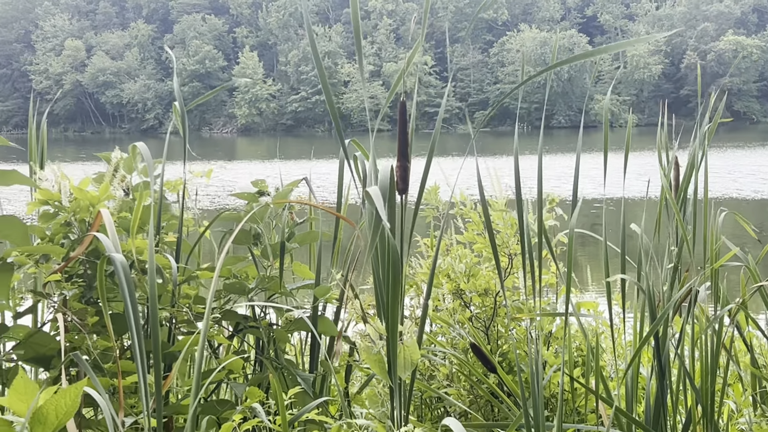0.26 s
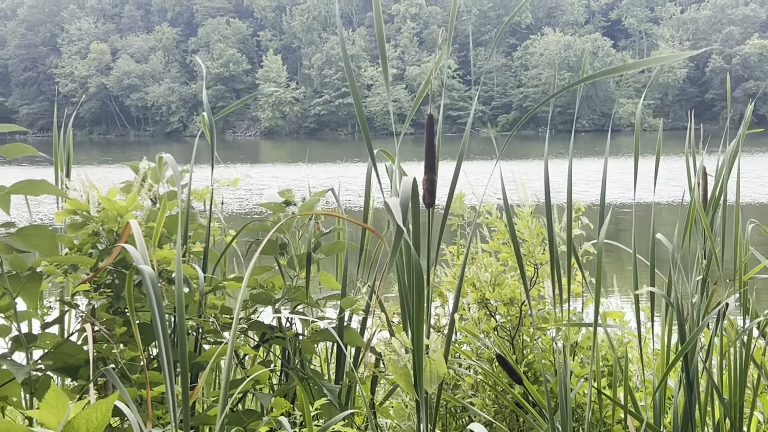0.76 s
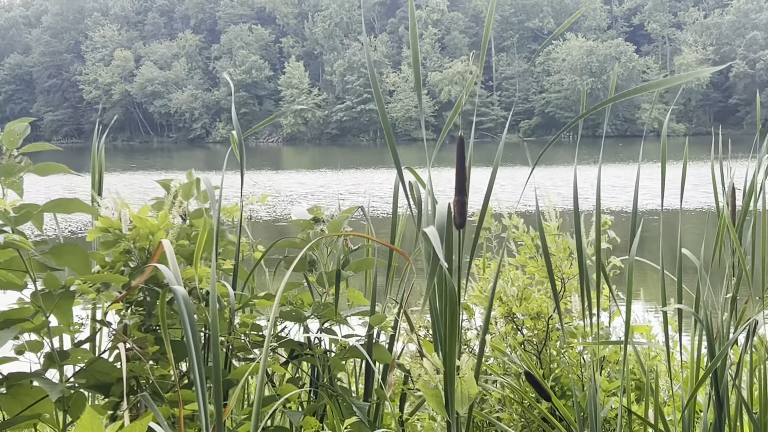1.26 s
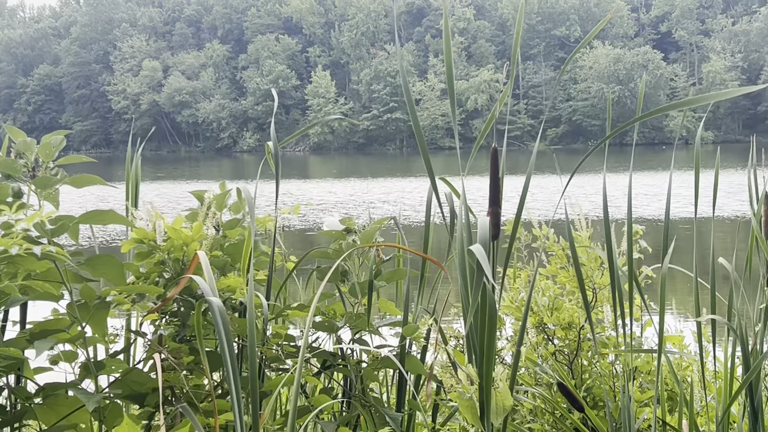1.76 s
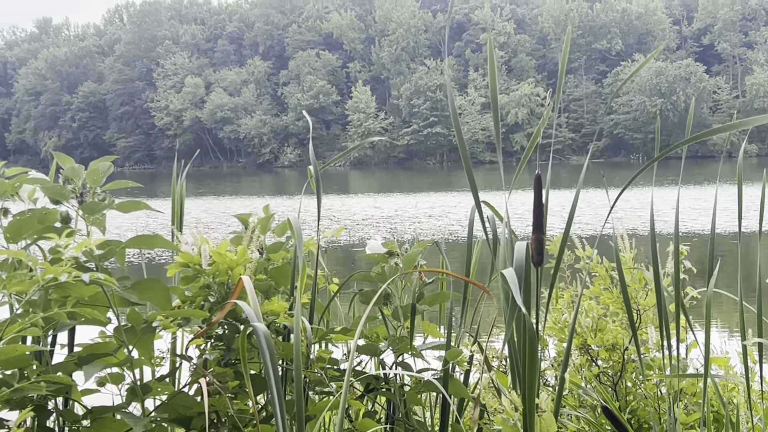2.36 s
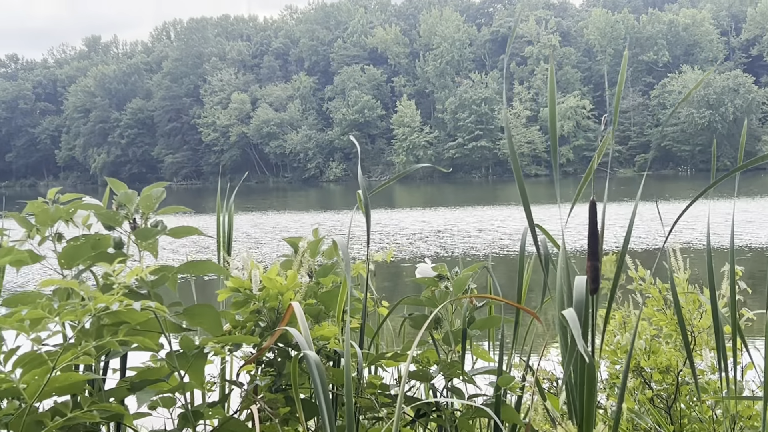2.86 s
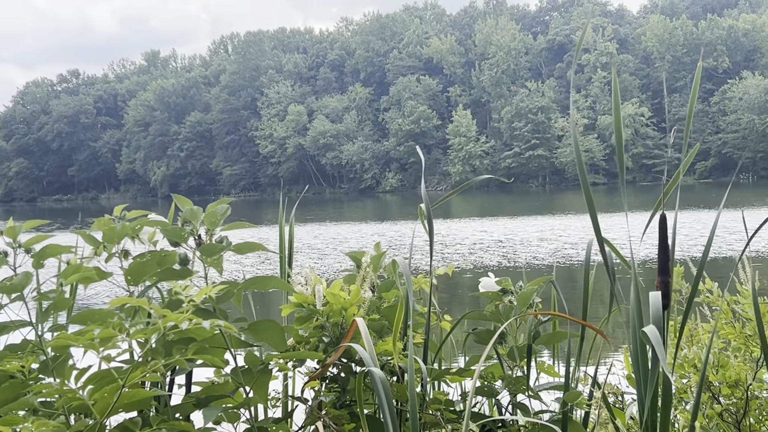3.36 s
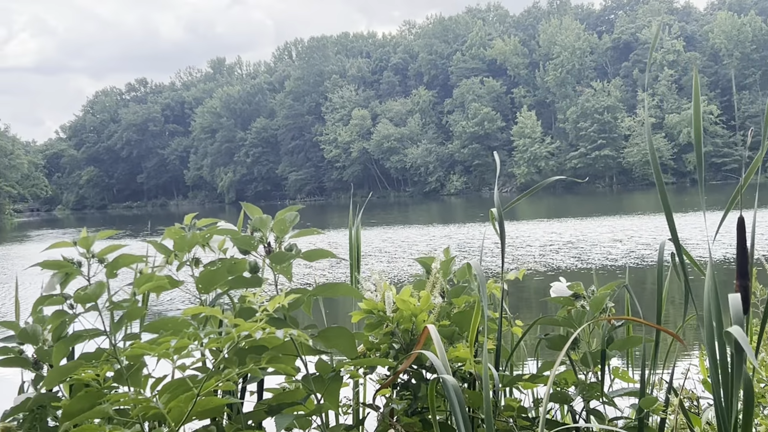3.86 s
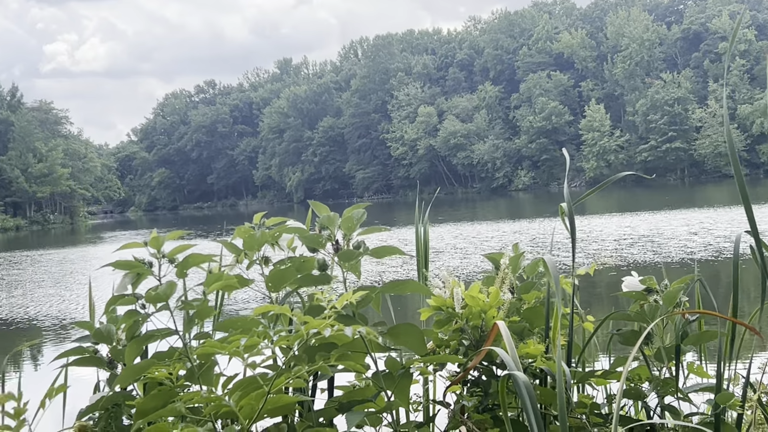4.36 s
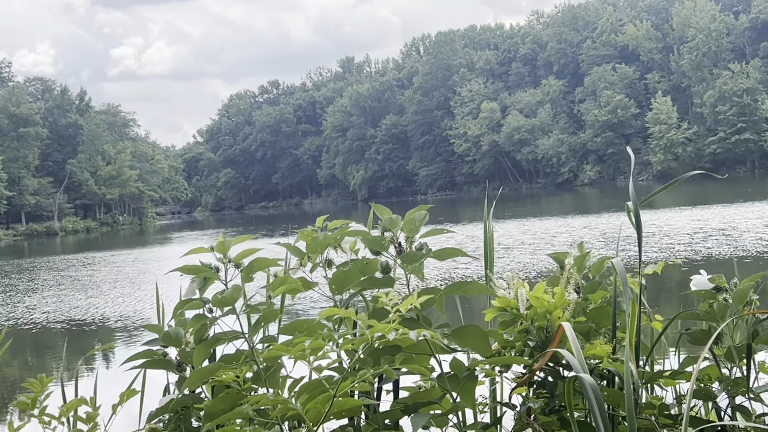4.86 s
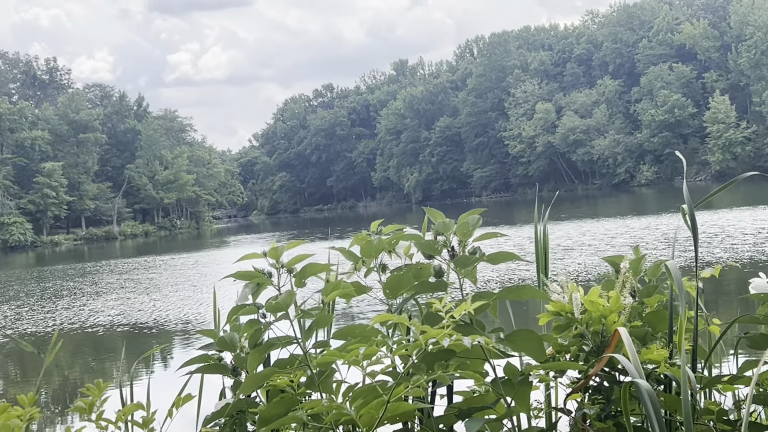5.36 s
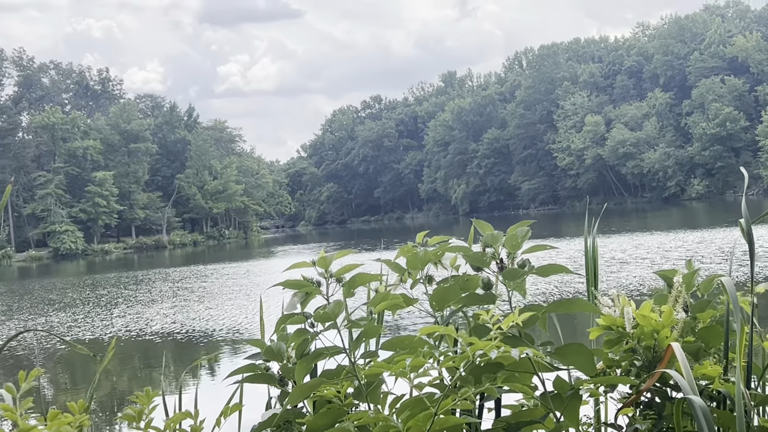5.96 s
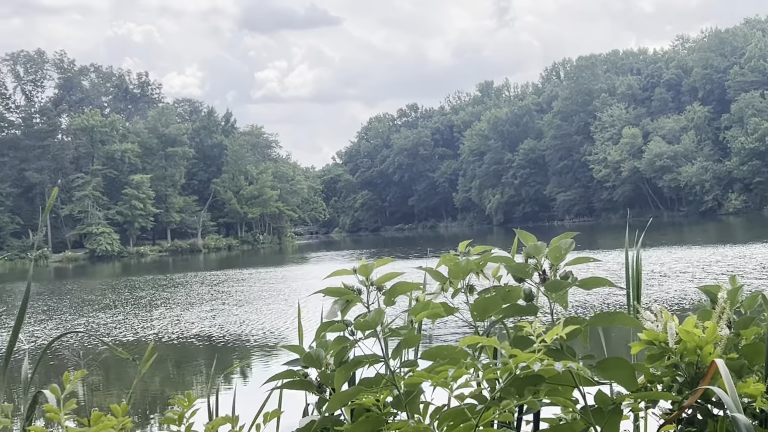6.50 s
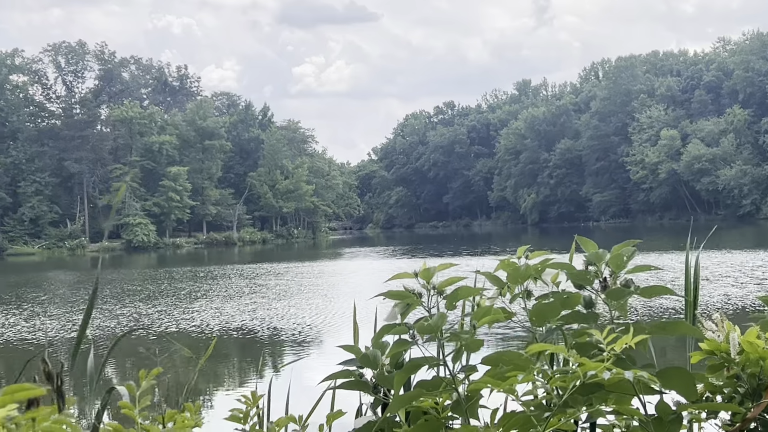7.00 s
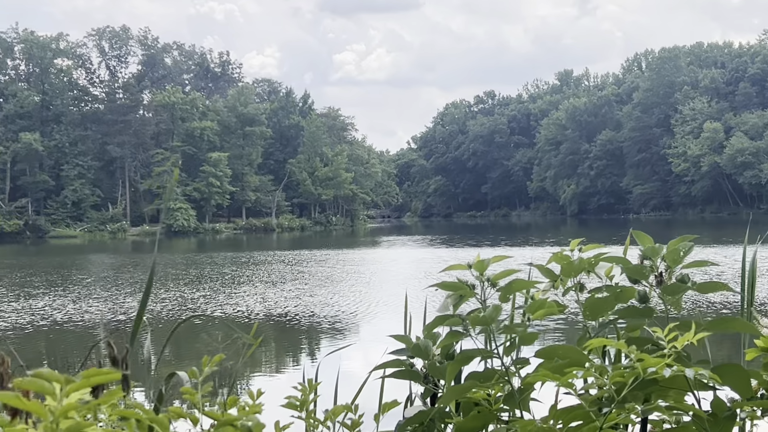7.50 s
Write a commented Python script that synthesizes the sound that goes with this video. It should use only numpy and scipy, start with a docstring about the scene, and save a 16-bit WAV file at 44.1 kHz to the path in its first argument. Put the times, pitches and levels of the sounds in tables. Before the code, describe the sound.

Shrill katydid buzzes rise and stop by turns above pulsing crickets and faint far traffic, with soft stem snaps and a sharp crackle late on.

```python
"""A summer lakeside, the microphone close to the reeds. Meadow katydids, one near and others farther off,
sing mostly by turns: ticks, then a shrill buzz, made of tooth scrapes coloured by the wing.
Ground crickets trill without a pause as pulsed tones, before a hiss of distant insects.
Dry leaves brush past close by in dense tiny catches, and stems snap softly as short bursts of ringing noise.
Engines hum far off as single low notes, and shaped noise makes the rumble and roar of far traffic."""
import sys
import numpy as np
from scipy import signal
from scipy.fft import rfft, irfft
from scipy.io import wavfile

SR = 44100
rng = np.random.default_rng(int(sys.argv[2]) if len(sys.argv) > 2 else 0)


def materialize(psi):
    """Save the field psi as 16-bit PCM at rate SR to the path in sys.argv[1].

    A 1-D psi becomes a single channel; in a 2-D psi each row is a channel.
    """
    bounded = np.clip(np.atleast_2d(psi).T, -1, 1)
    quanta = np.round(bounded * 32767).astype(np.int16)
    wavfile.write(sys.argv[1], SR, quanta)


N = 341334
TIME = np.arange(N) / SR
FREQ = np.fft.rfftfreq(N, 1 / SR)


def amp(db):
    """Decibels to gain."""
    return 10 ** (np.asarray(db) / 20)


def unit(x):
    """Scales to rms 1."""
    return x / np.sqrt(np.mean(x ** 2) + 1e-20)


def across(points):
    """A spectrum table at every frequency, interpolated over log frequency."""
    hz, value = np.transpose(points)
    return np.interp(np.log(FREQ + 1), np.log(hz + 1), value)


def colour(x, points):
    """Filters by a spectrum that falls away below its first point; white noise keeps its power."""
    low_cut = 1 / np.sqrt(1 + (0.62 * points[0][0] / (FREQ + 1)) ** 6)
    gain = amp(across(points)) * low_cut
    return irfft(rfft(x) * unit(gain), N)


def wander(hz):
    """Smooth chance of rms 1, mostly slower than hz."""
    smooth = rfft(rng.standard_normal(N)) / (1 + (FREQ / hz) ** 4)
    return unit(irfft(smooth, N))


def grains(per_s, spread_db):
    """Tiny random impacts of uneven size and either sign, rms 1."""
    size = amp(spread_db * np.minimum(rng.exponential(1, N), 4))
    sign = rng.choice([-1., 1.], N)
    struck = rng.random(N) < per_s / SR
    return unit(size * sign * struck)


def both_ears(mid, side, side_db):
    """Left and right share one sound and differ by another."""
    pair = mid + amp(side_db) * np.array([side, -side])
    return pair / np.sqrt(1 + amp(side_db) ** 2)


def scatter(x, t60, wet_db, side_db):
    """Adds the many faint echoes from stems and leaves, a little different at each ear."""
    t = TIME[:SR // 3]
    tail = both_ears(*rng.standard_normal((2, len(t))), side_db)
    tail = tail * amp(-60 * t / t60) * (t > .002)  # no echo in the first 2 ms
    tail = tail / np.linalg.norm(tail[0])
    return x + amp(wet_db) * signal.fftconvolve(x[None], tail, axes=1)[:, :N]


# Wing colour of the katydid close to the microphone, then of those farther off: pitch_hz, relative level_db
NEAR_WING = [(4000, -70), (6500, -31), (8500, -21.5), (10000, -14), (11500, -8.5), (13000, -6.5),
             (14100, 0.5), (15000, -7), (16000, -5.5)]
FAR_WING = [(4000, -52), (6500, -24.5), (8500, -15.5), (10000, -11), (11500, -4.5), (13200, 0), (14200, 3),
            (16000, -3)]
# Songs near and far, a run of ticks and then a buzz; a count below one gives no ticks, and a song that
# ends before its buzz has ticks alone:
# start_s, tick_count (rounded), tick_gap_s, tick_level_db, end_s, buzz_level_db, wing_strokes_per_s
NEAR_SONGS = [(.901, 4, 0.071, -34.5, 2.41, -36, 43.5), (3.864, 5, .0662, -33, 5.195, -35.5, 46.5),
              (6.793, 4, .0686, -33, 7.9, -35.5, 46.5)]
FAR_SONGS = [(-.5, 0.5, .067, -41, .9, -49, 50.6), (-.165, 3, .067, -50, 0.79, -48, 49.5),
             (2.486, 2, .058, -46.5, 3.78, -48, 49.7), (2.732, 4, .069, -49, 3.74, -45.5, 50.1),
             (4.6, -1.5, .067, -48, 5.57, -46.5, 47.9), (5.652, 3.5, .0663, -44.5, 6.6, -45, 49.7),
             (6.733, 4, .067, -46.5, 6.3, -54, 50)]
TICK_FALL_S, TICK_RISE_S = 0.014, 0.004
BUZZ_PAUSE_S, BUZZ_ATTACK_S, BUZZ_RELEASE_S = 0.037, .006, 0.043  # the pause follows the last tick


def katydid(songs, wing, hurry_s, back_share, swell_db, swell_s):
    """A file of teeth scrapes a broadly ringing wing: hurrying ticks, then a swelling, pulsing buzz."""
    force = np.zeros(N)
    for start_s, tick_count, gap_s, tick_db, end_s, buzz_db, strokes_per_s in songs:
        last_s = start_s
        for k in range(round(tick_count)):
            last_s = start_s + k * gap_s - hurry_s * k ** 3  # later ticks come sooner
            age = np.clip(TIME - last_s + 0.0036, 0, .1)
            tick = np.minimum(age / TICK_RISE_S, 1) * np.exp(-(age / TICK_FALL_S) ** 3)
            force += amp(tick_db) * tick
        age = np.maximum(TIME - last_s - BUZZ_PAUSE_S, 0)
        turns = age * strokes_per_s + .05 * wander(8.9)
        # loud closing strokes; back_share is the force left between them
        stroke = back_share + (1 - back_share) * np.sin(np.pi * turns) ** 2
        attack = np.clip(age / BUZZ_ATTACK_S, 0, 1)
        release = np.clip((end_s - TIME) / BUZZ_RELEASE_S, 0, 1)
        swell = amp(buzz_db - swell_db * np.exp(-age / swell_s))
        force = np.hypot(force, swell * attack * release * stroke)
    teeth = grains(per_s=9000, spread_db=-1.5) * force * amp(.5 * wander(40))
    return scatter(colour(teeth, wing), t60=0.15, wet_db=-3, side_db=-17.5)


FACING_S, TURN_S = 4.7, 2.2  # when the microphone faces the near crickets, and how long its turn takes


def turned_away(loss_db):
    """Gain of the crickets as the microphone turns towards them and away again."""
    return amp(-loss_db * (1 - np.exp(-((TIME - FACING_S) / TURN_S) ** 2)))


def wing_tone(turns, hz, scoop_hz, glide_hz, length, jitter_hz, uneven_db):
    """One tone pulse a wing stroke: it scoops up to its pitch, which then sinks as the stroke slows."""
    place = ((turns + .5) % 1 - .5) / length  # 0 mid-pulse; length is the half-width as a share of a cycle
    scoop = scoop_hz * np.clip(-place, 0, 1.3) ** 4
    glide = glide_hz * np.clip(place, -1.5, 1.5)
    pitch = hz - scoop - glide + jitter_hz * wander(251.4)
    shape = np.exp(-np.abs(place) ** 3) * amp(uneven_db * wander(45))
    return unit(shape * np.sin(2 * np.pi * np.cumsum(pitch) / SR))


def crickets():
    """Two near crickets trill almost in step at different pitches; two farther ones blur into a ring."""
    # pulses per second, then the place in the cycle at the start
    upper_turns = 16.105 * TIME + .99 + .02 * wander(8)
    lower_turns = 16.088 * TIME + .87 + 0.015 * wander(6.8)
    upper = wing_tone(upper_turns, hz=7657, scoop_hz=259.8, glide_hz=54.6, length=.18,
                      jitter_hz=47.5, uneven_db=2)
    lower = wing_tone(lower_turns, hz=7398, scoop_hz=30.4, glide_hz=30, length=.165,
                      jitter_hz=42.04, uneven_db=2)
    near = amp(-58.0) * turned_away(loss_db=1.5) * upper
    near += amp(-57.5) * turned_away(loss_db=6.0) * lower
    far_upper = wing_tone(15.3 * TIME + 0.15 * wander(1.0), hz=7660, scoop_hz=20, glide_hz=22, length=.5,
                          jitter_hz=88.7, uneven_db=2.5)
    far_lower = wing_tone(16.9 * TIME + 0.15 * wander(0.84), hz=7330, scoop_hz=20, glide_hz=22, length=.5,
                          jitter_hz=119.8, uneven_db=3.5)
    far = amp(-63.5) * far_upper + amp(-68) * far_lower
    return scatter(near + far, t60=0.053, wet_db=-9.5, side_db=0.5)


# Leaves brushing past close to the microphone: start_s, slip_s, level_db (at the slip), pressure (0 to 1)
BRUSHES = [(6.185, 6.29, -52.5, .2), (6.333, 6.47, -35.9, 0.7), (6.515, 6.625, -53, 0.24)]
# Colour of a light and of a firm brush: pitch_hz, relative level_db
LIGHT_BRUSH = [(900, -35), (2000, -21), (3500, -3), (5000, 9), (8000, 10), (11000, 8.5), (16000, -25)]
FIRM_BRUSH = [(250, -10), (600, -5.5), (1000, -4.5), (1500, 8), (2200, 4), (3100, 0), (4200, 3), (8000, 5),
              (11500, 3), (16000, 1)]
# a leaf presses harder as it bends, then lets go
BRUSH_ATTACK_S, BRUSH_BUILD_DB_PER_S, BRUSH_RELEASE_S = 0.034, 47, 0.02


def leaves():
    """Dry leaves slip in dense little catches; a firmer push sets the whole blade sounding."""
    edge, blade = np.zeros((2, N))
    for start_s, slip_s, level_db, pressure in BRUSHES:
        attack = np.clip((TIME - start_s) / BRUSH_ATTACK_S, 0, 1)
        bend = attack * amp(-BRUSH_BUILD_DB_PER_S * np.maximum(slip_s - TIME, 0))
        release = np.exp(-np.maximum(TIME - slip_s, 0) / BRUSH_RELEASE_S)
        force = amp(level_db + 0.89 * wander(120)) * bend * release
        edge += force * np.sqrt(1 - pressure)
        blade += force * np.sqrt(pressure)
    light = colour(grains(per_s=2000, spread_db=4.0) * edge * amp(2.1 * wander(70)), LIGHT_BRUSH)
    firm = colour(grains(per_s=6900, spread_db=1.1) * blade, FIRM_BRUSH)
    return scatter(light + firm, t60=.02, wet_db=-9, side_db=-4)


# Stems snapping close by: start_s, peak_db (before echoes), centre_hz, width_hz (of one filter pass), t60_s
SNAPS = [(2.346, -54, 1990, 2490, 0.11), (2.368, -47.5, 5700, 7000, .05), (2.493, -37.5, 5600, 1900, 0.015),
         (2.497, -49.5, 1900, 2200, 0.01), (3.123, -48.5, 2670, 2200, 0.028),
         (3.555, -60, 2400, 3500, 0.027), (3.629, -51.5, 3300, 5000, 0.13), (3.658, -49, 3200, 5000, .08),
         (4.052, -43, 1690, 2400, 0.012), (6.241, -44, 6500, 6000, .008), (6.499, -28.5, 6500, 8000, .006),
         (6.567, -39.5, 4500, 6000, .02), (6.596, -34.5, 6550, 8000, 0.0061),
         (6.916, -53, 5300, 2000, .015)]


def snaps():
    """Each snap is a short burst in one broad resonance of a stem; they are close and nearly dry."""
    out, t = np.zeros(N), TIME[:SR // 10]
    for start_s, peak_db, centre_hz, width_hz, t60_s in SNAPS:
        burst = rng.standard_normal(len(t)) * amp(-60 * t / t60_s)
        stem = signal.iirpeak(centre_hz, centre_hz / min(width_hz, SR / 4), fs=SR)
        crack = signal.lfilter(*stem, signal.lfilter(*stem, burst))
        out[round(start_s * SR):][:len(t)] += amp(peak_db) * crack / abs(crack).max()
    return scatter(out, t60=.06, wet_db=-8, side_db=-6)


# Far engines across the water: loudest_s, swell_s, pitch_hz (at full load), level_db (at full load)
ENGINES = [(6.1, 1.5, 155.6, -47), (7.302, 0.702, 92.44, -43)]
ENGINE_SAG, ENGINE_WAVER_DB = .04, 0.2  # share by which the pitch is lower off load; rms level waver


def engine(loudest_s, swell_s, pitch_hz, level_db):
    """Only one low note carries across the water; its level and pitch rise and fall with the load."""
    load = 1 / (1 + ((TIME - loudest_s) / swell_s) ** 4)
    pitch = pitch_hz * (1 - ENGINE_SAG * (1 - load))
    tone = np.sin(2 * np.pi * np.cumsum(pitch) / SR)
    return amp(level_db + ENGINE_WAVER_DB * wander(3)) * load * tone


# Colour of the distant insects: pitch_hz, relative level_db
CHORUS = [(3000, -28), (4000, -20), (5000, -15.5), (6800, -15.5), (7500, 4.5), (8500, -17.5),
          (10000, -16.5), (11500, -9), (13200, -7.5), (14500, -6.5), (16000, -6.5)]


def chorus():
    """Many distant insects merge into a fine hiss."""
    mid, side = rng.standard_normal((2, N))
    hiss = both_ears(mid, side, side_db=-17)
    return amp(-56.0 + .5 * wander(6.7)) * colour(hiss, CHORUS)


# Spectrum shape of the far traffic: pitch_hz, relative density_db
TRAFFIC = [(20, -24), (32, -15), (52, -0.5), (72, 1), (100, -1.5), (156, -7), (220, -13.5), (300, -16),
           (400, -24), (560, -26), (750, -29), (1000, -29.5), (1400, -37), (1950, -40.5), (2500, -52.5),
           (4000, -54.5), (8000, -72)]
# Traffic at the two ears: pitch_hz, likeness (0 unrelated, 1 the same)
LIKENESS = [(25, 0.93), (60, 1), (250, 0.92), (450, 0.86), (750, 0.41), (1300, 0.31), (1850, 0.024),
            (2200, 1), (3000, 1)]
RUMBLE_DB, RUMBLE_SWELL_DB = -42.5, 1.8
ROAR_DB, ROAR_DB_PER_S = -51, 0.1476  # level at the start, and its rise


def traffic():
    """Far road rumble, alike at both ears in the bass, under a roar of tyres that slowly draws nearer."""
    a, b = rfft(rng.standard_normal((2, N)))
    same = np.clip(across(LIKENESS), 0, 1)
    mid, side = a * np.sqrt(1 + same), b * np.sqrt(1 - same)
    pair = np.array([mid + side, mid - side]) * amp(across(TRAFFIC))
    low = 1 / (1 + (FREQ / 140) ** 8)  # rumble below 140 Hz, roar above
    rumble = amp(RUMBLE_DB + RUMBLE_SWELL_DB * wander(0.9)) * unit(irfft(pair * low, N))
    roar = amp(ROAR_DB + ROAR_DB_PER_S * TIME) * unit(irfft(pair * (1 - low), N))
    return (rumble + roar) * amp([[-.35], [.35]])  # a little louder on the right


def scene():
    """Insects and leaves in the middle, traffic all around."""
    near = katydid(NEAR_SONGS, NEAR_WING, hurry_s=0.00032, back_share=0.21, swell_db=6.5, swell_s=0.091)
    far = katydid(FAR_SONGS, FAR_WING, hurry_s=.0001, back_share=0.13, swell_db=16, swell_s=0.14)
    engines = sum(engine(*row) for row in ENGINES)
    return near + far + crickets() + leaves() + snaps() + engines + chorus() + traffic()


# Phase between the two channels in the top treble: pitch_hz, left_lead_rad (negative: the left lags)
CHANNEL_PHASE = [(8700, 0), (9000, -1.4), (9900, -3.0), (10350, -3.3), (11750, -6.2), (12300, -6.35),
                 (13600, -9.2), (13950, -9.55), (15250, -12.4), (16500, -12.7)]
EDGE_HZ = 15850  # upper band limit


def record(dry):
    """The two channels drift apart in phase towards the top treble; then the band limit."""
    lead = np.interp(FREQ, *np.transpose(CHANNEL_PHASE))
    turn = np.exp(.5j * np.array([lead, -lead]))  # half the phase on each channel
    pair = irfft(rfft(dry) * turn, N)
    low_pass = signal.firwin(511, EDGE_HZ, window=("kaiser", 9), fs=SR)
    return signal.oaconvolve(pair, low_pass[None], "same")


dry = scene()
out = record(dry)
materialize(out)
```